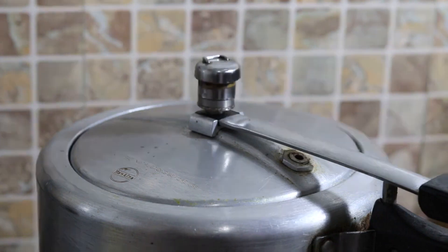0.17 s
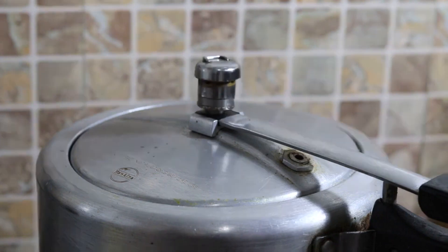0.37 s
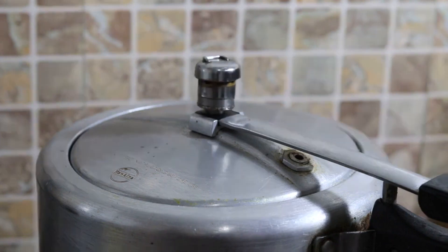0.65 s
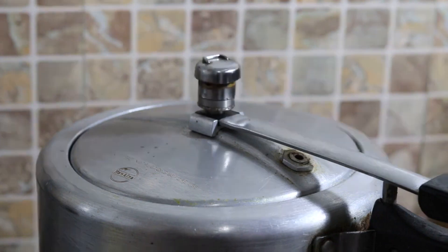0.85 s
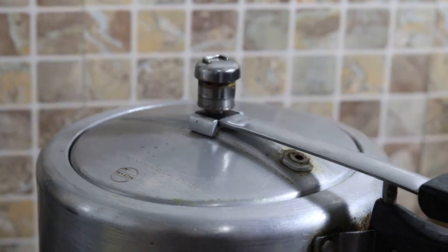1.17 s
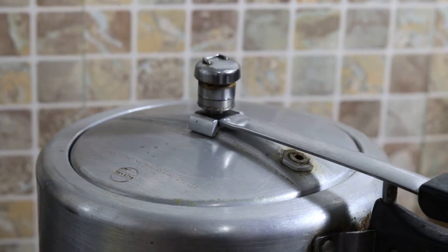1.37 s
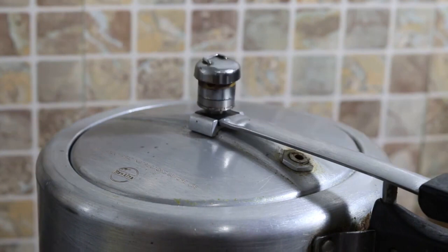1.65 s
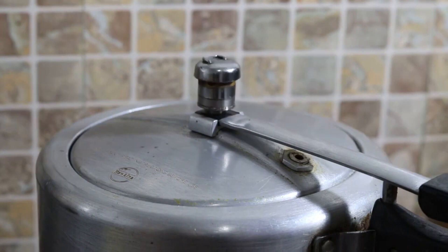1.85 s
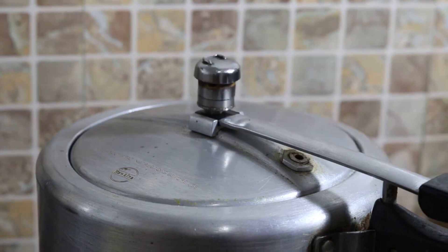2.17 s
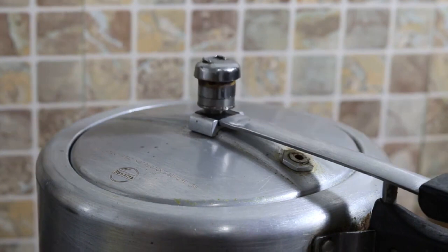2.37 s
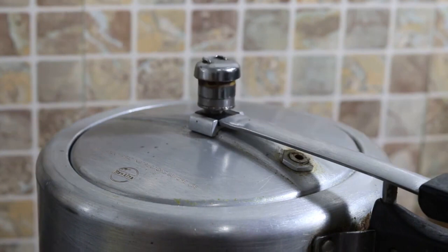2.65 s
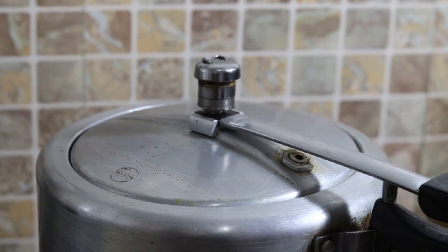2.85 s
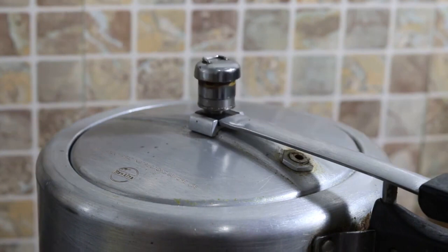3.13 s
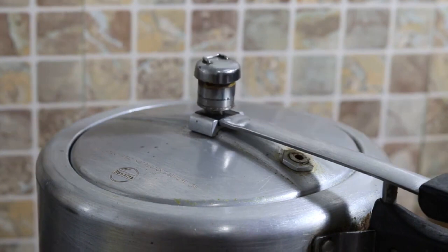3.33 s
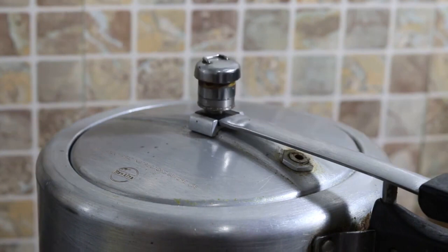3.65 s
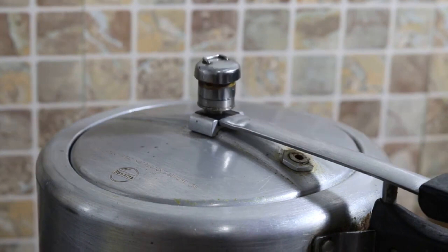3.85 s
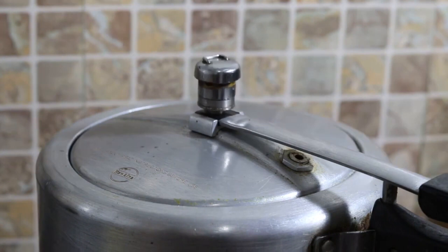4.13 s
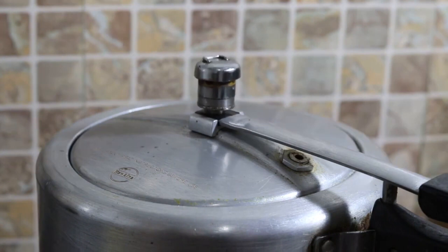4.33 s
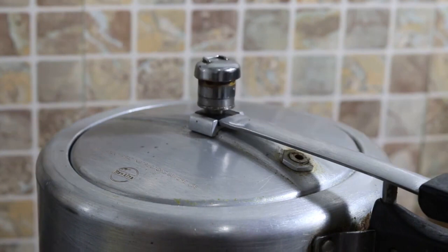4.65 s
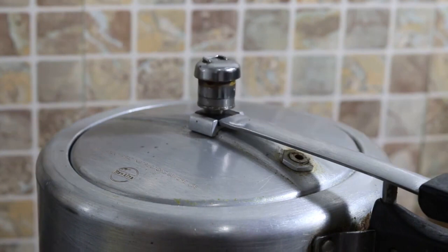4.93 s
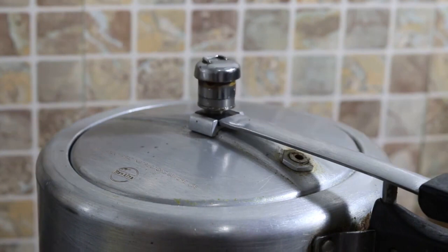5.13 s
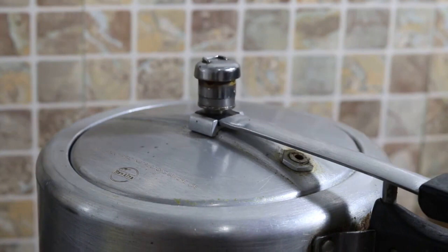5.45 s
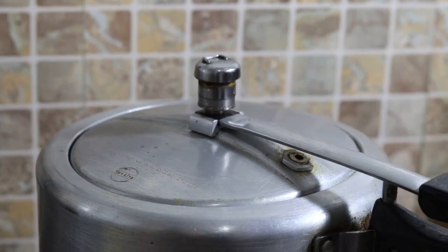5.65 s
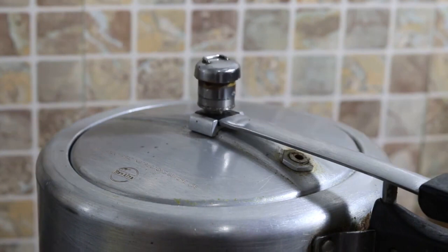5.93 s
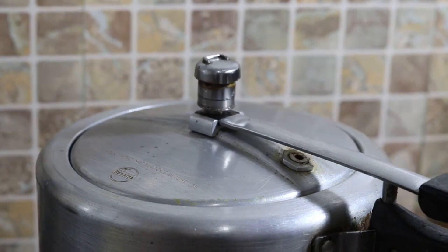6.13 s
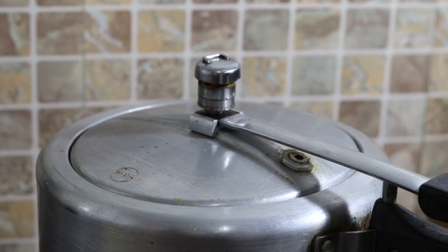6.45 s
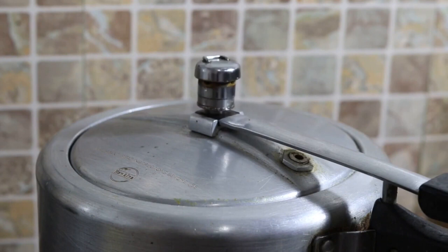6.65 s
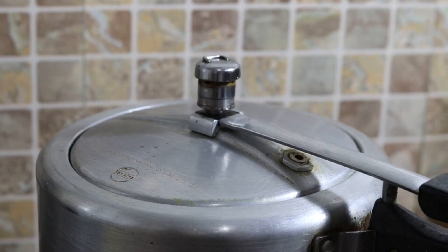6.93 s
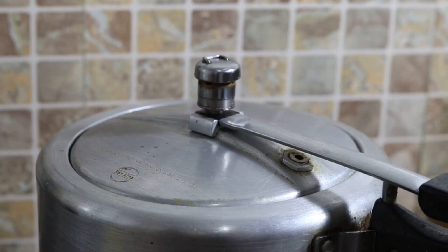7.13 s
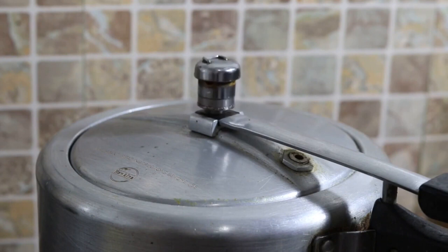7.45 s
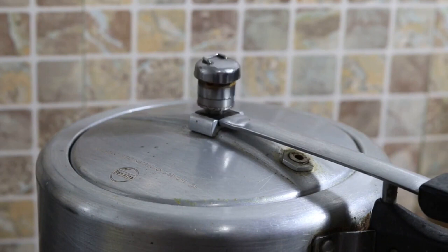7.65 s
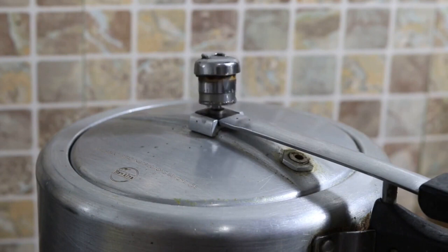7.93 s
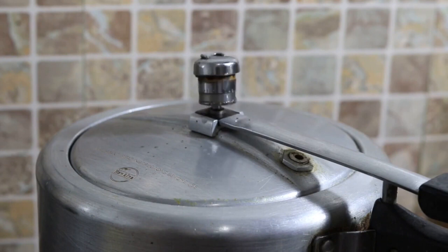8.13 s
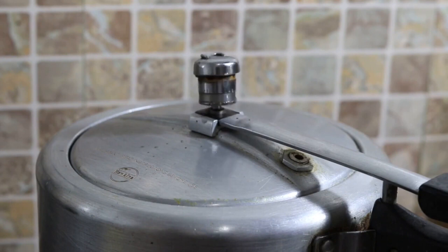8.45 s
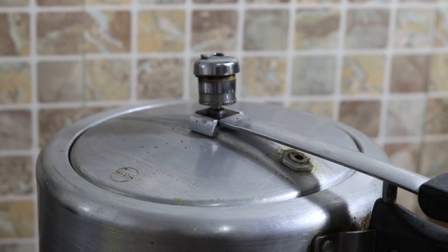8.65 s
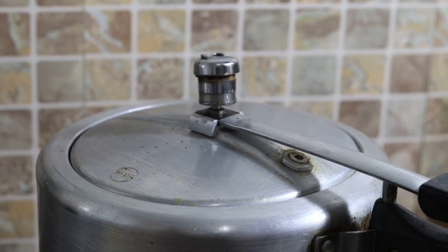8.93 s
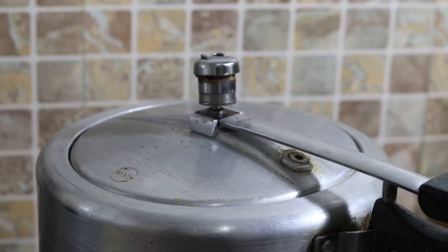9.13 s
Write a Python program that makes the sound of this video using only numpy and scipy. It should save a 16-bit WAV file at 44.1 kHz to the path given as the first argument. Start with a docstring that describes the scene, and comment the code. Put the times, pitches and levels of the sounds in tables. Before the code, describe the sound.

Rapid strong-and-weak puffs of sizzling steam chug from a rocking valve weight above a soft stove rush, finally releasing in a steady bright jet.

```python
"""A short low rumble with a faint tick, then a hush; a small tiled kitchen cuts in, heard in stereo from close by.
A pressure cooker stands on a lit stove: filtered noise is the burner's rush, a wavering sine the low hum.
The valve weight rocks and shapes hissing noise into strong and weak puffs of steam, about seven a second.
Then it lifts and the steam blows freely, so that the recorder's gain control pushes the kitchen down."""
import sys
import numpy as np
from scipy import signal
from scipy.fft import rfft, irfft
from scipy.io import wavfile

SR = 44100
rng = np.random.default_rng(int(sys.argv[2]) if len(sys.argv) > 2 else 0)


def waveform_to_disk(signal):
    """Save audio, clipped to [-1, 1], as 16-bit WAV at the path in sys.argv[1]."""
    frames = np.transpose(np.atleast_2d(signal))
    scaled = np.clip(frames, -1, 1) * 32767
    samples = np.round(scaled).astype(np.int16)
    wavfile.write(sys.argv[1], SR, samples)


N = 409688
T = np.arange(N) / SR
HZ = np.maximum(np.fft.rfftfreq(N, 1 / SR), 1)
SIDES = np.array([[1], [-1]])  # left, right
CUT_IN_S = 0.138  # the kitchen starts here
BLOW_S = 8.11  # the weight lifts here


def undb(db):
    """Decibels to gain."""
    return 10 ** (np.asarray(db) / 20)


def unit(x):
    """Scale to rms 1."""
    return x / np.sqrt(np.mean(x ** 2))


def curve(rows):
    """Join (time, value) rows by straight lines."""
    return np.interp(T, *np.transpose(rows))


def spectrum(rows):
    """Join (frequency, value) rows on a log-frequency axis."""
    hz, value = np.transpose(rows)
    return np.interp(np.log(HZ), np.log(hz), value)


def colour(x, db):
    """Filter by a gain in dB at each frequency."""
    return irfft(rfft(x) * undb(db), N)


def walk(rate):
    """Smooth random wander of rms 1, up to about rate changes a second."""
    spread = np.exp(-(HZ / rate) ** 2)
    return unit(irfft(rfft(rng.standard_normal(N)) * spread, N))


def lag(power, seconds):
    """Running mean that forgets exponentially."""
    keep = np.exp(-1 / (seconds * SR))
    return signal.lfilter([1 - keep], [1, -keep], power)


def bump(offset, length, squareness=2):
    """Rounded rise and fall, 1 at the centre and half at the ends of its length."""
    return 2 ** -np.minimum(np.abs(2 * offset / length) ** squareness, 60)


def widen(pair, likeness):
    """Turn two unrelated signals into left and right with the given correlation."""
    c = np.clip(likeness, -.99, .99)
    mid, side = rfft(pair)
    return irfft(mid * np.sqrt((1 + c) / 2) + SIDES * side * np.sqrt((1 - c) / 2), N)


def rush(shape, likeness):
    """Steady coloured noise of rms 1, as alike in both channels as likeness says."""
    noise = colour(rng.standard_normal((2, N)), spectrum(shape))
    return unit(widen(noise, likeness))


# colour of the opening rumble and hush: (frequency [Hz], relative level per Hz [dB])
RUMBLE_COLOUR = [(25, -13), (50, -8), (130, -20), (270, -4.5), (380, -21), (520, -15), (750, -22),
                 (950, -23), (1500, -26), (2000, -28), (3000, -35), (14000, -50)]


def opening(rumble_db=-39.0, hush_db=-61, rumble_end_s=0.059):
    """Low noise that drops suddenly to a hush, which stays on underneath; a decaying noise burst is the tick."""
    tick_s, tick_db, tick_decay_s, tick_hz = 0.013, -41, 0.0013, 4500
    tick = unit(colour(rng.standard_normal(N), -20 * np.log(HZ / tick_hz) ** 2))
    decay = np.exp(-np.abs(T - tick_s) / tick_decay_s) * (T > tick_s)
    level = undb(rumble_db) * (T < rumble_end_s) + undb(hush_db)
    return rush(RUMBLE_COLOUR, likeness=0.83) * level + undb(tick_db) * tick * decay


# colour of the lit burner and the kitchen around it: (frequency [Hz], relative level per Hz [dB])
BURNER_COLOUR = [(22, -26), (42, 6), (65, -6), (110, -3.5), (215, -3.5), (265, -1), (320, -2.5), (440, 1.5),
                 (530, -4), (800, -4), (1500, -6.5), (4000, -20), (12000, -66)]


def burner(level_db=-43):
    """The burner's soft low rush, nearly alike in both channels, unsteady by about 1 dB."""
    return undb(level_db + 1.0 * walk(7.5)) * rush(BURNER_COLOUR, likeness=0.87)


def wavering(hz, width):
    """A tone whose strength and phase wander within a narrow band."""
    wander = walk(width) + 1j * walk(width)
    return np.real(wander * np.exp(2j * np.pi * hz * T))


# resting level of the strongest hum line, before its steady and unsteady shares;
# it sinks once the weight lifts: (time [s], level [dB])
HUM_REST = [(.3, -50.5), (2.2, -55.5), (3.2, -57.5), (4, -56.5), (8.12, -54.5), (8.22, -60)]
# swells of the hum, most as the lift nears: (time [s], peak level [dB], length at half power [s])
HUM_SWELLS = [(5.3, -50, 0.092), (6.3, -48, 0.073), (6.53, -47, 0.11), (6.79, -50, .11), (7.36, -45, 0.13),
              (7.82, -40.5, .09), (8.05, -46.5, 0.12)]
# weaker wavering tones: (frequency [Hz], level [dB], width of wander [Hz])
FAINT_TONES = [(49.6, -63.5, 2.1), (155, -62.5, 5.5), (262.5, -59, 10.5), (272.6, -64, 6),
               (370.4, -54, 9.7)]


def hum(hum_hz=97.2, drift_hz=1.95, steady_db=-2, unsteady_db=-3, unsteady_width_hz=7):
    """A low sine of drifting pitch that swells now and then, with a few fainter, unsteady tones."""
    phase = 2 * np.pi * np.cumsum(hum_hz + drift_hz * walk(7.0)) / SR
    rest = undb(curve(HUM_REST))
    swells = sum(undb(db) ** 2 * bump(T - s, length) for s, db, length in HUM_SWELLS)
    power = (undb(steady_db) * rest) ** 2 + swells
    steady = np.sqrt(2 * power) * np.sin(phase)
    unsteady = undb(unsteady_db) * rest * wavering(hum_hz, unsteady_width_hz)
    faint = sum(undb(db) * wavering(hz, width) for hz, db, width in FAINT_TONES)
    return steady + unsteady + faint


# narrow resonances and dips of the valve and the lid, before the ring factor:
# (frequency [Hz], width [Hz], lift [dB])
VALVE_RESONANCES = [(997, 30, 6.5), (1240, 33, 2), (1254, 155, 3), (1505, 39, 2), (1897, 360, 4.5),
                    (2610, 360, 4.5), (3500, 250, 4.5), (4110, 180, 3), (6360, 75, 5.5), (7000, 45, -11),
                    (7010, 29, 7.5), (6870, 60, 7.5), (8000, 170, 0.5), (8900, 90, -4)]


def jet(shape, flutter_db, ring):
    """Turbulent steam as noise, ringing the valve's resonances and fluttering in strength."""
    lift_db = sum(db / (1 + (2 * (HZ - hz) / width) ** 2) for hz, width, db in VALVE_RESONANCES)
    hiss = colour(rng.standard_normal((2, N)), spectrum(shape) + ring * lift_db)
    return unit(hiss) * undb(flutter_db * walk(32))


def wandering_bounces(x, depth=0.12, count=6):
    """Bounces off lid and wall wander at random, so the hiss keeps changing colour."""
    delays_s = rng.uniform(.0004, .009, count)
    bounces = sum(walk(12.0) * np.roll(x, int(s * SR), axis=1) for s in delays_s)
    return unit(x + depth * bounces)


# colour of the free jet and of the droplets: (frequency [Hz], relative level per Hz [dB])
FREE_JET_COLOUR = [(300, -55), (600, -22), (880, -28), (1020, -15.5), (1600, -11), (2000, -8.5),
                   (2700, -5.5), (4000, -5), (5200, -4.5), (6800, 1.5), (8200, 1.5), (9500, -1.5),
                   (12000, -5.5), (15500, -13)]


def spit(rate):
    """Tiny droplets bursting in the jet: random clicks, rate of them a second in each channel on average."""
    drops = (rng.random(N) < rate / SR) * rng.uniform(-0.46, 1, (2, N))
    return unit(colour(drops, spectrum(FREE_JET_COLOUR)))


# the weight rocks to and fro, one strong and one weak puff a swing:
# (time [s], swings per second [Hz], weak puff relative to strong [dB])
ROCKING = [(0.2, 3.782, -3.2), (0.55, 2.941, -8.3), (0.75, 3.653, -1.3), (1.4, 3.328, -3.6),
           (2.35, 3.827, -0.7), (3.2, 3.432, -4.6), (3.9, 3.84, -0.7), (4.15, 3.031, -10.8),
           (4.35, 3.571, 2.0), (4.65, 3.697, -6.9), (5.0, 3.134, -2.3), (5.75, 3.816, -1.3),
           (5.95, 3.664, -6.1), (7.05, 3.345, -0.6), (7.3, 3.371, -4.1), (8.0, 3.233, -1.5)]


def rocking(squareness):
    """Steam power let out by the rocking weight: a wide gap on one side of each swing, a narrower one opposite."""
    first_puff_s, weak_puff_at = 0.17, 0.52  # the second is a share of a swing after the strong puff
    strong_open, weak_open = 0.3, 0.22  # puff length at half power, share of a swing
    puff_db = -19.5  # peak of a strong puff relative to unit hiss
    ease_db, ease_s = -2, .12  # the first puffs are eased, as the gain control starts from rest
    s, rate, weak_db = np.transpose(ROCKING)
    swings = np.cumsum(np.interp(T, s, rate)) / SR
    swings = swings - np.interp(first_puff_s, T, swings)

    def from_nearest(turn):
        """Signed distance to the nearest whole swing."""
        return (turn + .5) % 1 - .5

    strong = bump(from_nearest(swings), strong_open, squareness)
    weak = bump(from_nearest(swings - weak_puff_at), weak_open, squareness)
    weak = weak * undb(np.interp(T, s, weak_db)) ** 2
    eased_db = ease_db * np.exp(-np.maximum(T - first_puff_s, 0) / ease_s)
    return undb(puff_db + eased_db) ** 2 * (strong + weak) * (T < BLOW_S)


# colour of steam squeezed under the seated weight: (frequency [Hz], relative level per Hz [dB])
SQUEEZED_JET_COLOUR = [(300, -23), (600, -13), (880, -17), (1020, -8.5), (1600, -6), (2000, -4.5),
                       (2700, -3), (4000, -4), (5400, -4), (6500, -0.36), (7500, 3.04), (9300, -2.5),
                       (11000, -4.5), (15500, -10)]


def puffs(leak_db=-40, spit_db=-21, brighten=0.34, bright_hz=10000, body_hz=2300):
    """Each tilt opens a gap under the weight; the wider the gap, the throatier and more sizzling the jet."""
    linger_db, linger_s, deepen, vary = -5.8, .04, .18, .12
    power = rocking(squareness=2.32)
    # some steam always leaks, and each puff lingers in the room
    linger = undb(linger_db) ** 2 * lag(power, linger_s)
    flow = np.sqrt(power + undb(leak_db) ** 2 + linger)
    hiss = wandering_bounces(jet(SQUEEZED_JET_COLOUR, flutter_db=0.6, ring=0.93))
    hiss = hiss + undb(spit_db) * spit(rate=69)
    sizzle = irfft(rfft(hiss) / (1 + (bright_hz / HZ) ** 6), N)
    body = irfft(rfft(hiss) * np.exp(-(2 * np.log(HZ / body_hz)) ** 2), N)
    gap = flow / np.sqrt(np.mean(flow ** 2)) - 1
    # the gap never opens in quite the same shape, so body and sizzle also vary by chance
    more_sizzle = (brighten * gap + vary * walk(36)) * sizzle
    more_body = (deepen * gap + vary * walk(4.1)) * body
    return flow * (hiss + more_sizzle + more_body)


# the free jet takes over from the squeezed one while the weight rises: (time [s], share of power [0-1])
LIFT = [(8.2, 0.8), (8.3, 0.8), (8.37, 0.99)]


def blow_off(spit_db=-16):
    """The jet bursts out, then grows and thins as the weight rises clear of the vent; it falters once."""
    open_db, full_db = -18, -10  # relative to unit hiss
    attack_s, grow_s = 0.039, 0.14
    falter_s, falter_length_s, falter_db = 8.62, 0.032, -3.5
    free = np.clip(curve(LIFT), 0, 1)
    free_jet = jet(FREE_JET_COLOUR, flutter_db=0.15, ring=0.83)
    squeezed_jet = jet(SQUEEZED_JET_COLOUR, flutter_db=-2.0, ring=1.0)
    steam = np.sqrt(free) * free_jet + np.sqrt(1 - free) * squeezed_jet
    age = np.maximum(T - BLOW_S, 0)
    level_db = full_db + (open_db - full_db) * np.exp(-age / grow_s)
    level_db = level_db + falter_db * bump(T - falter_s, falter_length_s)
    attack = np.minimum(age / attack_s, 1)
    return attack * undb(level_db) * (wandering_bounces(steam) + undb(spit_db) * spit(rate=81))


def kitchen(x, early_db=-13, early_t60=.14):
    """Quick reflections from the lid and the tiles, a fast-decaying noise echo, ripple the spectrum."""
    t = T[:SR // 5]
    echoes = rng.standard_normal((2, len(t))) * undb(-60 * t / early_t60) * (t > .002)
    echoes = unit(echoes) / np.sqrt(len(t))  # unit energy a channel
    return x + undb(early_db) * signal.fftconvolve(x, echoes, axes=1)[:, :N]


# likeness of the hiss in the two channels: (frequency [Hz], correlation [-1 to 1])
HISS_LIKENESS = [(500, 0.58), (1100, 0.58), (1600, 0.15), (3000, 0.17), (5200, 0.39), (7500, 0.054),
                 (11000, 0.24), (15000, 0.31)]
# lean of the hiss to one side: (frequency [Hz], left minus right [dB])
HISS_PAN = [(60, 7), (110, 0.5), (200, -5), (380, -2), (700, 0.5), (1290, -3), (2380, -2.0), (4400, -1.0),
            (8120, -1.0), (15000, 0)]


def scene(steam_db=-1.05):
    """Steam in the kitchen over burner and hum, cutting in over the opening's hush."""
    steam = widen(kitchen(puffs() + blow_off()), spectrum(HISS_LIKENESS))
    steam = undb(steam_db) * colour(steam, SIDES * spectrum(HISS_PAN) / 2)
    stove = burner() + hum()
    return opening() + (steam + stove) * (T > CUT_IN_S)


def record(dry, ceiling_db=-22.5, follow_s=.12, top_hz=15750):
    """Slow gain control holds the mean level under a ceiling; the top is cut steeply."""
    loudness = np.sqrt(lag(np.mean(dry ** 2, axis=0), follow_s))
    held = dry / np.maximum(1, loudness / undb(ceiling_db))
    top_cut = signal.ellip(12, .1, 85, top_hz, fs=SR, output="sos")
    return signal.sosfilt(top_cut, held)


dry = scene()
out = record(dry)
waveform_to_disk(out)
```